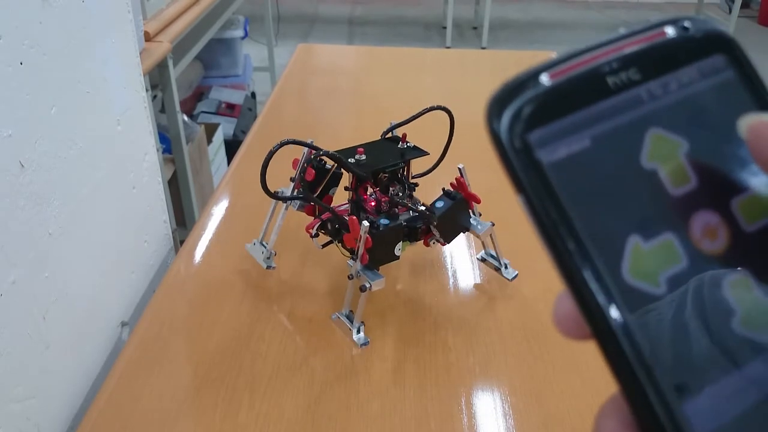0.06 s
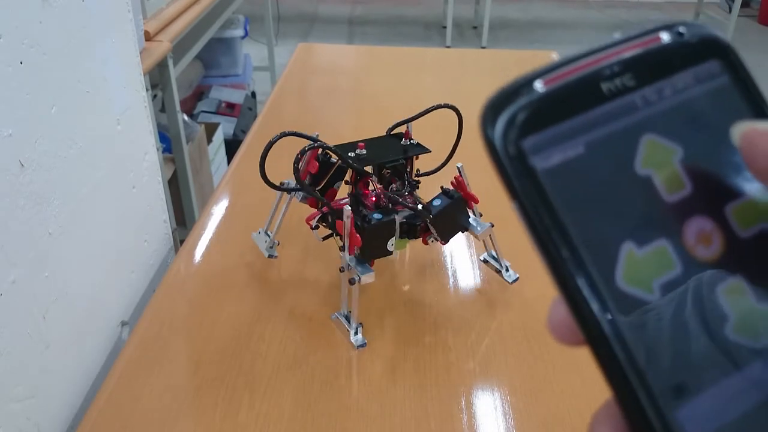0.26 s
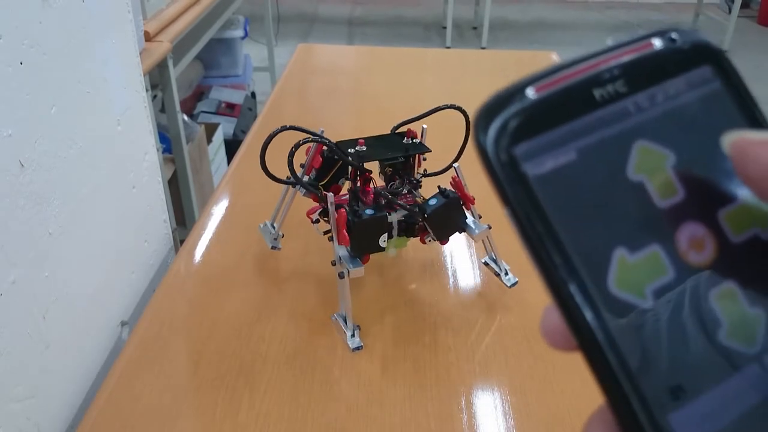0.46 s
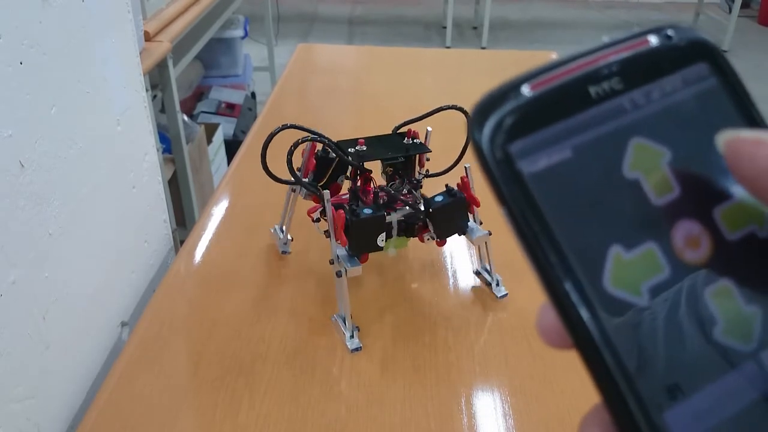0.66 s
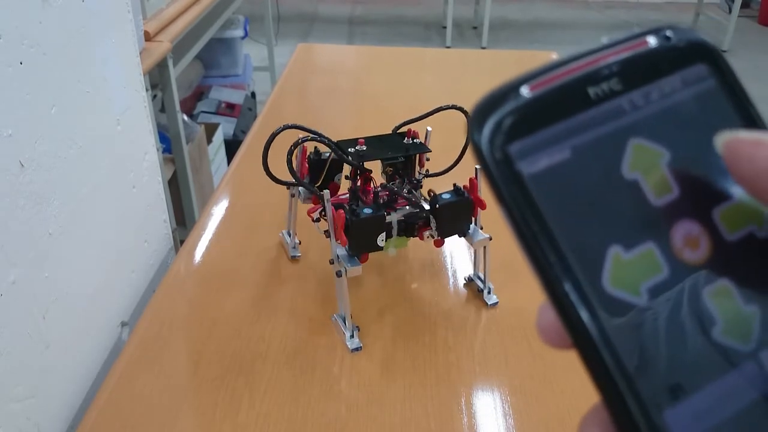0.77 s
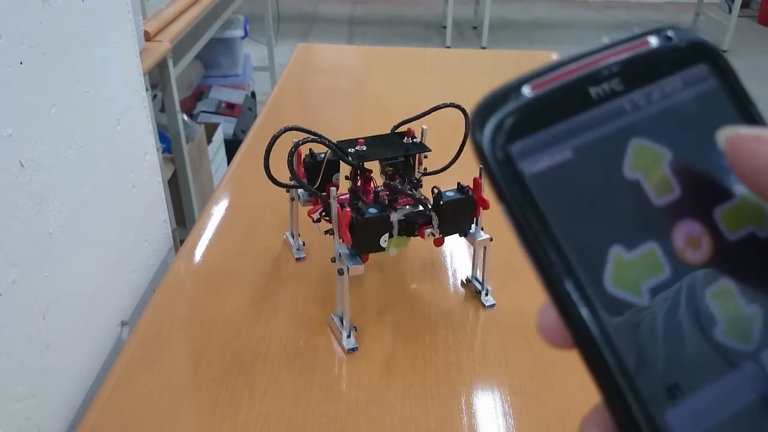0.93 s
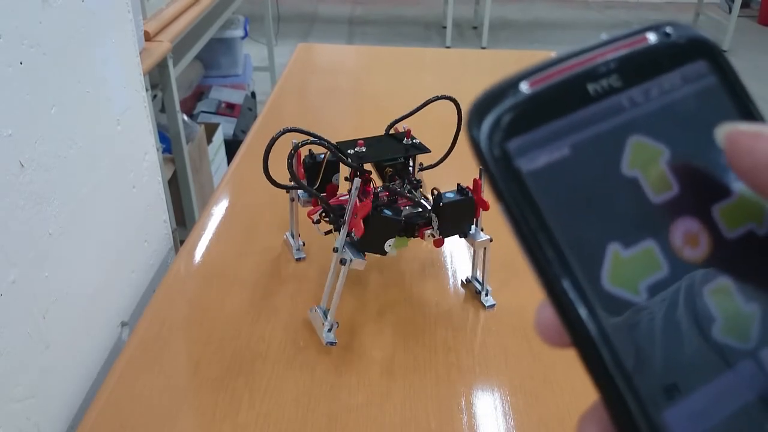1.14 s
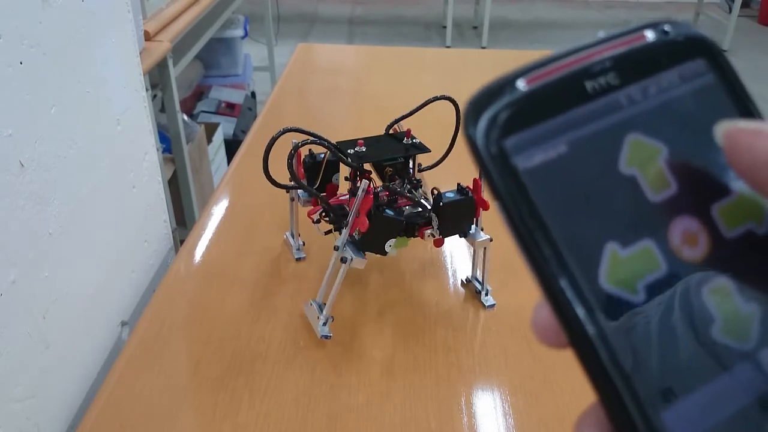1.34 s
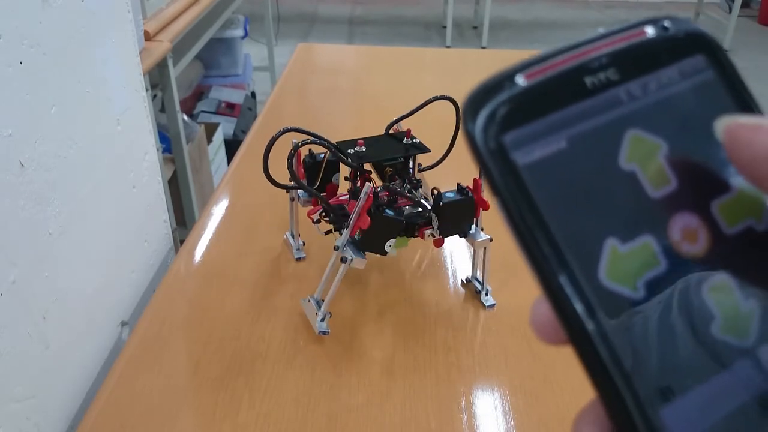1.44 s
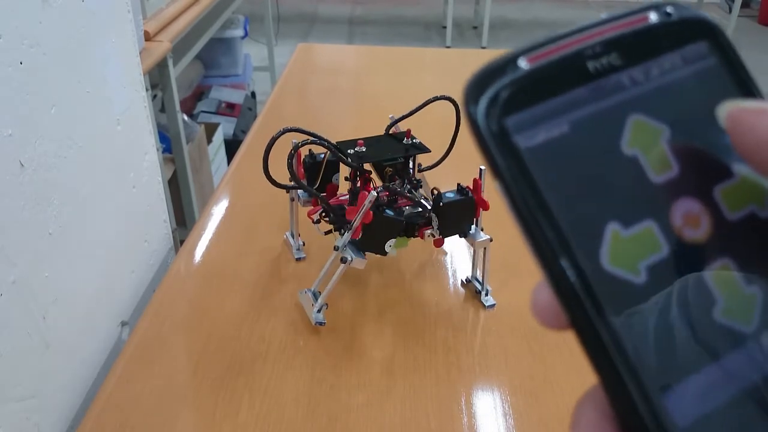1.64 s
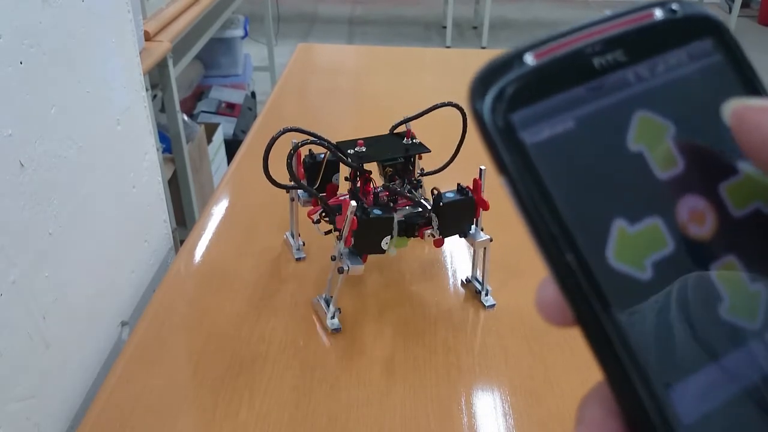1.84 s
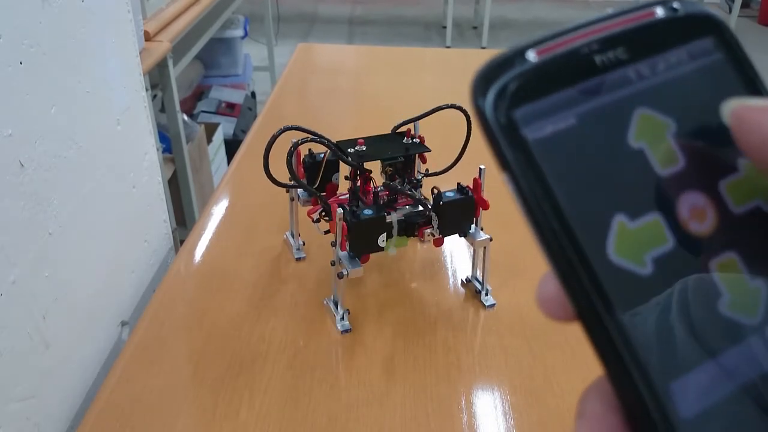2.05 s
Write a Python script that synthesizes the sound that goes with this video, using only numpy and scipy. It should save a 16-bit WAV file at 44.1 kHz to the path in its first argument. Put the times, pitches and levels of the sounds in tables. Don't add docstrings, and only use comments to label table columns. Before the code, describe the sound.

A little robot's servos grind and whir in bursts, then hold a fainter steady whine; a bright metal foot landing and sharp ticks come midway, over quiet room hum and low air buffeting on the right.

```python
import sys
import numpy as np
from scipy import signal
from scipy.fft import rfft, irfft
from scipy.io import wavfile
from scipy.ndimage import uniform_filter1d

SR = 44100
rng = np.random.default_rng(int(sys.argv[2]) if len(sys.argv) > 2 else 0)


def dump_mix(stems):
    frames = np.atleast_2d(stems).T
    limited = np.clip(frames, -1, 1)
    pcm = np.round(limited * 32767).astype(np.int16)
    wavfile.write(sys.argv[1], SR, pcm)


def decibels_to_gain(level_db):
    exponent = np.asarray(level_db, float) / 20
    return 10 ** exponent


N = 92610


def evened(x):
    return x / np.sqrt(np.mean(x ** 2, axis=-1, keepdims=True) + 1e-20)


def wandering(shape, size):
    return evened(uniform_filter1d(rng.standard_normal(shape), size=size))


def resonate(x, hz, width_hz):
    r = np.exp(-np.pi * width_hz / SR)
    return 2 * signal.lfilter([1 - r], [1, -r * np.exp(2j * np.pi * hz / SR)], x).real


def coloured(points, channels):
    f, db = np.transpose(points)
    bins_hz = np.fft.rfftfreq(N, 1 / SR)
    shape_db = np.interp(np.log(bins_hz + 1), np.log(f + 1), db, left=-90, right=-90)
    return evened(irfft(rfft(rng.standard_normal((channels, N))) * decibels_to_gain(shape_db), N))


def arch(start_s, length_s, bend):
    t = np.arange(N) / SR
    return np.sin(np.pi * np.clip((t - start_s) / length_s, 0, 1) ** bend)


def right_late(x, lag_s):
    return np.array([x[0], np.roll(x[1], round(lag_s * SR))])


def room_tone():
    # frequency in Hz, level in dB per Hz.
    wash_spectrum = [(35, -2.5), (85, -0.5), (150, -3), (240, -14), (650, -15), (1300, -28), (3000, -29.5),
                     (12500, -36.5)]
    # time in seconds, gain in dB.
    swell = [(0, 8.5), (0.049, 1.5), (1.6, 1.5), (1.8, 3.5), (2.1, -0.5)]
    # frequency in Hz, width in Hz, level in dB.
    hum_bands = [(85, 6, -57), (133, 6, -61), (1170, 8, -79)]
    same = 0.43
    a, b = coloured(wash_spectrum, channels=2)
    wash = np.array([a, same * a + np.sqrt(1 - same ** 2) * b])
    level_db = -53.5 + np.interp(np.arange(N) / SR, *np.transpose(swell))
    hums = sum(decibels_to_gain(db) * evened(resonate(rng.standard_normal(N), hz, width_hz))
               for hz, width_hz, db in hum_bands)
    return decibels_to_gain(level_db) * wash + hums


def far_knocks():
    # start in seconds, frequency in Hz, level in dB, length in seconds.
    knocks = [
        (1.71, 550, -59, .1),
        (1.86, 405, -62, .07),
        (1.97, 380, -59, .06),
        (1.68, 690, -62, .06),
    ]
    t = np.arange(N) / SR
    return sum(decibels_to_gain(db) * np.sqrt(2) * np.sin(2 * np.pi * hz * t) * arch(start_s, length_s, 0.81)
               for start_s, hz, db, length_s in knocks)


def table_thrum():
    thrum = decibels_to_gain(-48) * arch(0.9, 0.36, 0.81) * np.sin(2 * np.pi * 60 * np.arange(N) / SR)
    return thrum * np.c_[[1.4, .4]]


def draught():
    # time in seconds, flutter rate in Hz, level in dB.
    flutter = [(0.0, 21.0, -38), (0.22, 17.3, -23), (0.29, 23.0, -10), (0.36, 24.5, -19), (0.45, 12.8, -23),
               (0.55, 19.2, -20), (0.63, 24.1, -14), (0.75, 19.3, -14), (0.85, 23.3, -7), (0.97, 22.1, -12),
               (1.1, 21.5, -21), (1.26, 24.6, -27), (1.37, 24.1, -16), (1.44, 17.1, -31), (1.55, 20.1, -21),
               (1.65, 13.0, -33), (1.8, 20.6, -26), (2.1, 21.5, -41)]
    # frequency in Hz, level in dB per Hz.
    left_spectrum = [(20, -22), (50, 11), (90, -8), (130, 0), (230, -16), (450, -13.5), (1200, -25),
                     (1600, -42)]
    right_spectrum = [(30, 9), (50, 4.5), (70, -5), (130, -13.5), (230, -17.5), (450, -30), (1200, -40.5),
                      (1600, -115)]
    buffet_db = [-37, -19.5]
    leak_db, follow, start_turns = -48, 0.9, -.21
    t, (s, hz, db) = np.arange(N) / SR, np.transpose(flutter)
    level_db = np.interp(t, s, db)
    turns = np.cumsum(np.interp(t, s, hz)) / SR + start_turns
    swing = np.sqrt(2) * decibels_to_gain(level_db) * np.cos(2 * np.pi * turns)
    lumps_db = wandering((2, N), 1500)
    buffet = np.r_[coloured(left_spectrum, channels=1), coloured(right_spectrum, channels=1)]
    buffet = buffet * decibels_to_gain(follow * level_db + lumps_db + np.c_[buffet_db])
    return swing * decibels_to_gain([[leak_db], [0]]) + buffet


def reflections(x):
    t60_s, first_s, density = 0.64, .002, .05
    size = SR // 2
    t = np.arange(size) / SR
    echoes = rng.choice([-1., 1.], (2, size)) * (rng.random((2, size)) < density)
    echoes = echoes * decibels_to_gain(-60 * t / t60_s) * (t > first_s)
    echoes = echoes / np.linalg.norm(echoes, axis=1, keepdims=True)
    return signal.fftconvolve(x, echoes, axes=1)[:, :N]


def drags():
    # start in seconds, length in seconds, level in dB, centre in Hz.
    rubs = [
        (0.221, 0.048, -56.5, 590),
        (0.552, 0.19, -58, 700),
        (0.858, .1, -60, 488),
        (1.283, 0.11, -56.5, 1780),
        (1.292, 0.136, -53, 218),
        (.98, 0.079, -50.5, 98.6),
    ]
    out = 0
    for start_s, length_s, db, hz in rubs:
        a, b = rng.standard_normal((2, N))
        rub = np.array([a, .8 * a + .6 * b]) * decibels_to_gain(1.4 * wandering(N, 300))
        rub = evened(resonate(resonate(rub, hz, hz), hz, hz))
        out = out + decibels_to_gain(db) * rub * arch(start_s, length_s, 0.53) ** .5
    return out


def feet():
    # start in seconds, level in dB, metal ring in dB, table brightness in dB per octave.
    taps = [
        (.245, -59, -8, 1),
        (0.561, -59.5, 4, -0.5),
        (0.738, -57, -23.5, -4),
        (1.2483, -50, 8, 2),
        (1.2519, -50, 3, 2),
        (1.2702, -50, 13, 2),
        (1.2752, -52, 11, 1),
        (1.29, -53, -16, -6),
    ]
    # frequency in Hz, level in dB, t60 in seconds.
    foot_modes = [(4020, -5.5, 0.015), (4620, 0.5, 0.021), (5200, 0.5, 0.002), (6560, -5.5, .006),
                  (7600, -3.5, 0.0027), (11150, 11, 0.003), (15500, -12, .004)]
    # frequency in Hz, level in dB, t60 in seconds; table modes are drawn along this curve.
    table_curve = [(107.8, -9.5, 0.22), (206, 1, 0.16), (463, 0, 0.067), (825, 4.5, 0.1),
                   (1236, -1.5, 0.051), (2000, -10, 0.01), (4604, -5.5, 0.01)]
    press_s, count = 0.004, 60
    out, t = np.zeros((2, N)), np.arange(6000) / SR
    f, f_db, f_t60_s = np.transpose(table_curve)
    foot_hz, ring_db, ring_t60_s = np.transpose(foot_modes)[:, :, None]
    for start_s, db, foot_db, tilt_db in taps:
        place = (np.arange(count) + rng.random(count)) / count
        hz = (f[0] * (f[-1] / f[0]) ** place)[:, None]
        mode_db = np.interp(hz, f, f_db) + tilt_db * np.log2(hz / 500)
        modes = decibels_to_gain(mode_db - 60 * t / np.interp(hz, f, f_t60_s)) * np.sin(2 * np.pi * hz * t)
        heard = np.sign(rng.standard_normal(count)) * decibels_to_gain(3.3 * rng.standard_normal((2, count)) - 1.5)
        press = 0.17 * rng.standard_normal(1000) + (t[:1000] == 0)
        press = press * np.exp(-t[:1000] / press_s)
        press = press / np.linalg.norm(press)
        top = signal.fftconvolve(heard @ modes, press[None], axes=1)[:, :len(t)]
        struck_hz = foot_hz * rng.uniform(0.84, 1.04, foot_hz.shape)
        metal = decibels_to_gain(ring_db + foot_db - 60 * t / ring_t60_s) * np.sin(2 * np.pi * struck_hz * t)
        metal = np.array([metal.sum(axis=0), 2.03 * metal[:3].sum(axis=0)])
        at = round(start_s * SR)
        out[:, at:at + len(t)] += decibels_to_gain(db) * (top + metal)
    return out


def settling_chirp():
    glide = (1.2700, 6200, 3950, -39, .018)
    glide_s = 0.0018
    start_s, from_hz, to_hz, db, t60_s = glide
    t, out = np.arange(1500) / SR, np.zeros(N)
    turns = to_hz * t + (from_hz - to_hz) * glide_s * (1 - np.exp(-t / glide_s))
    at = round(start_s * SR)
    out[at:at + 1500] = decibels_to_gain(db - 60 * t / t60_s) * np.sin(2 * np.pi * turns)
    return out


def backlash_ticks():
    # start in seconds, level in dB, low ring in dB.
    tick_events = [(.4602, -49, -9), (.5575, -52, -2), (.579, -46, -5), (.9367, -45, -17),
                   (1.0374, -45.5, -10), (1.0903, -44, -15), (1.1666, -52, -14), (1.3165, -52, -8),
                   (1.3372, -53, -4), (1.3767, -46, -14), (1.3961, -35.5, -19), (1.4171, -48, -8),
                   (1.4734, -34.5, -20), (1.5553, -43, -7), (1.5802, -47, -18)]
    # frequency in Hz, level in dB, t60 in seconds.
    ring_modes = [(6900, -7, 0.0099), (9000, -3, .01), (11100, 3, 0.023), (14300, -11, .01)]
    low_hz, low_t60_s, chatter_s, right_db = 4750, 0.016, 0.0017, -12.5
    out, t = np.zeros(N), np.arange(1500) / SR
    hz, ring_db, t60_s = np.transpose(ring_modes)[:, :, None]
    for start_s, db, low_db in tick_events:
        struck_hz = hz * rng.uniform(0.94, 1.03, hz.shape)
        ring = (decibels_to_gain(ring_db - 60 * t / t60_s) * np.sin(2 * np.pi * struck_hz * t)).sum(axis=0)
        ring = ring + decibels_to_gain(low_db - 60 * t / low_t60_s) * np.sin(2 * np.pi * low_hz * t)
        chatter = rng.standard_normal(200) * np.exp(-t[:200] / chatter_s)
        at = round(start_s * SR)
        out[at:at + 1500] += decibels_to_gain(db) * np.convolve(ring, chatter / np.linalg.norm(chatter))[:1500]
    return out * decibels_to_gain([[0], [right_db]])


def stroke(start_s, length_s):
    rise_s, fall_s = .024, .012
    t = np.arange(N) / SR
    rise = np.clip((t - start_s) / rise_s, 0, 1)
    return rise * np.clip((start_s + length_s + fall_s - t) / fall_s, 0, 1)


def teeth():
    teeth_hz, jitter, spread_db, grind = 706, .35, 2.5, 0.52
    drive_hz, drive_at_s, drive_depth, drive_wander = 50, .002, .34, .6
    t = np.arange(N) / SR
    turns = np.cumsum(teeth_hz * np.exp(jitter * wandering(N, 200))) / SR
    clicks = np.diff(np.floor(turns), prepend=0) * decibels_to_gain(spread_db * rng.standard_normal(N))
    wander = wandering(N, 500)
    phase = 2 * np.pi * drive_hz * (t - drive_at_s) + drive_wander * wander
    push = (1 + drive_depth * np.cos(phase)) * decibels_to_gain(1.53 * wander)
    return push * (evened(clicks) + grind * rng.standard_normal(N))


def casing(level, modes):
    far_share = .8
    near, far = teeth(), teeth()
    drive = level * np.array([near, np.sqrt(1 - far_share) * near + np.sqrt(far_share) * far])
    out = 0
    for k, (hz, width_hz, left_db, right_db) in enumerate(modes):
        ring = resonate(resonate(drive, hz, width_hz), hz, 1.07 * width_hz)
        ring = ring * np.sqrt(SR / width_hz / 4)
        out = out + (-1) ** k * ring * decibels_to_gain([[left_db], [right_db]])
    return out


def servos():
    # start in seconds, length in seconds, level in dB, large-gear share in dB, pinion share in dB.
    surges = [
        (0.206, 0.27, -41, -3.5, -9.5),
        (0.541, 0.26, -44, -1.5, -11),
        (0.808, 0.17, -42.5, -5, -10),
        (1.015, 0.15, -47.5, -13, -2),
        (1.188, 0.092, -47.5, -4, -3.5),
        (1.304, 0.052, -58, 4, -1.5),
        (1.365, 0.22, -49.5, -0.5, 2),
        (1.639, 0.56, -49, -27, -6.5),
    ]
    # start in seconds, length in seconds, lower modes in dB, upper modes in dB.
    lifts = [
        (0.516, 0.29, -56.5, -55),
        (0.846, .14, -58.5, -50.5),
        (1.344, 0.267, -51, -58.5),
    ]
    # frequency in Hz, width in Hz, left level in dB, right level in dB.
    large_gear = [(2200, 2100, -34.5, -36.5), (3143, 430, -19, -20.5), (4320, 730, -16, -20.5),
                  (4835, 320, -15.5, -16.5), (5700, 900, -8, -6.5)]
    middle_gear = [(7000, 2100, -22.5, -21), (7246, 420, -5.5, -42), (8023, 740, -4.5, -28.5),
                   (9200, 1400, -23, -25), (14910, 640, -20.5, -22), (7250, 44, -25.5, -30),
                   (7500, 230, -35, -31.5), (5770, 200, -25.5, -19)]
    pinion = [(6410, 1030, -7, -7.5), (9620, 2100, -12, -24.5), (11520, 1350, -4, -18.5),
              (14500, 850, -16, -22)]
    loaded_low = [(1070, 690, -15.5, -15), (2898, 910, -11, -11.5), (4130, 560, -10, -10.5),
                  (4980, 790, -12.5, -4)]
    loaded_high = [(8360, 700, -6.5, -17), (8880, 1700, 1.5, -6), (10110, 1400, -2.1, -7.5)]
    hold_db, wake_s = -64.5, 0.15
    hold = stroke(wake_s, 10)
    start_s, length_s, db, large_db, pinion_db = np.transpose(surges)[:, :, None]
    surge = stroke(start_s, length_s)
    out = 0
    for modes, share_db, hold_share_db in ((large_gear, large_db, -3), (middle_gear, 0, 0),
                                           (pinion, pinion_db, -7)):
        level = (surge * decibels_to_gain(db + share_db)).sum(axis=0) + hold * decibels_to_gain(hold_db + hold_share_db)
        out = out + casing(level, modes)
    start_s, length_s, low_db, high_db = np.transpose(lifts)[:, :, None]
    lift = stroke(start_s, length_s)
    for modes, load_db in ((loaded_low, low_db), (loaded_high, high_db)):
        out = out + casing((lift * decibels_to_gain(load_db)).sum(axis=0), modes)
    return out


def scene():
    background = room_tone() + far_knocks() + table_thrum() + draught()
    taps = right_late(feet(), lag_s=.0001)
    gears = right_late(servos(), lag_s=.00035)
    walls = reflections(decibels_to_gain(-4) * gears + decibels_to_gain(-6) * taps)
    return background + drags() + taps + settling_chirp() + backlash_ticks() + gears + walls


def roll_off(x):
    return signal.sosfilt(signal.butter(12, 15800, fs=SR, output="sos"), x)


def record(dry):
    # frequency in Hz, threshold in dB.
    gate = [(700, -105), (1200, -73), (3000, -74.5), (3800, -70.5), (5500, -81.5), (10500, -76),
            (12300, -75), (14200, -77), (16000, -67)]
    gate_follow, gate_chance_db = 0.62, 4.5
    notch_hz, notch_width_hz, notch_db = 13500, 390, -10
    hz, _, z = signal.stft(dry, SR, nperseg=2048, noverlap=1024)
    z = z * decibels_to_gain(notch_db * np.exp(-((hz - notch_hz) / notch_width_hz) ** 4))[:, None]
    edges = np.unique((np.arange(0, 32, .2) ** 2).astype(int))
    sizes, power = np.diff(edges, append=len(hz)), abs(z) ** 2
    band_db = 10 * np.log10(np.add.reduceat(power, edges, axis=1) / sizes[:, None] + 1e-16)
    loud_db = 10 * np.log10(uniform_filter1d(power.sum(axis=(0, 1)), size=5) * 2 + 1e-12)
    chance = wandering(band_db.shape[1:], 6)
    edge_db = np.interp(hz[edges], *np.transpose(gate))[:, None]
    edge_db = edge_db + gate_follow * loud_db + gate_chance_db * chance
    keep = np.repeat(np.clip(band_db - edge_db, 0, 1), sizes, axis=1)
    mix = signal.istft(z * keep, SR, nperseg=2048, noverlap=1024)[1][:, :N]
    return roll_off(mix)


dry = scene()
out = record(dry)
dump_mix(out)
```